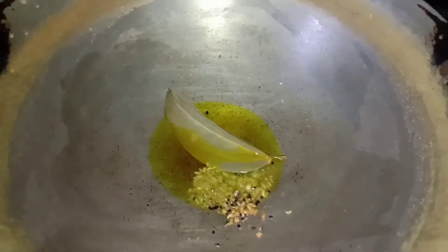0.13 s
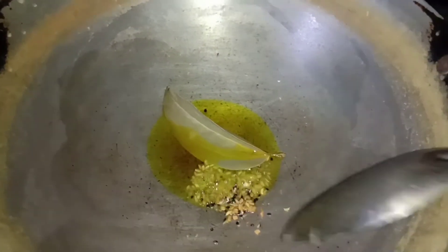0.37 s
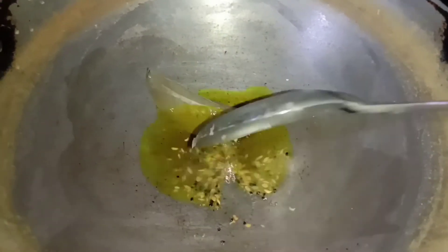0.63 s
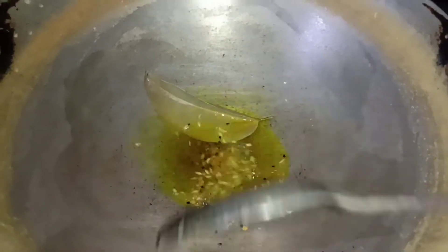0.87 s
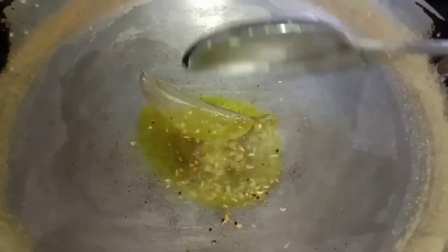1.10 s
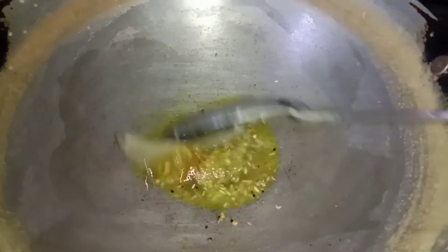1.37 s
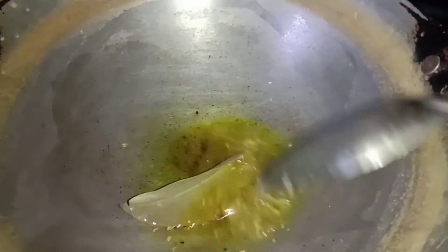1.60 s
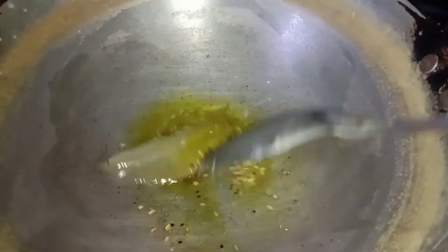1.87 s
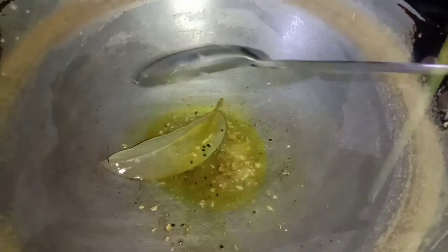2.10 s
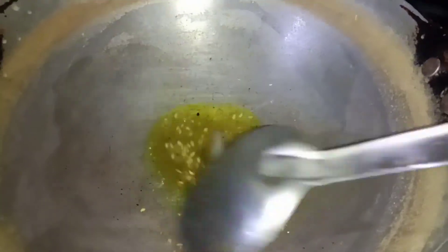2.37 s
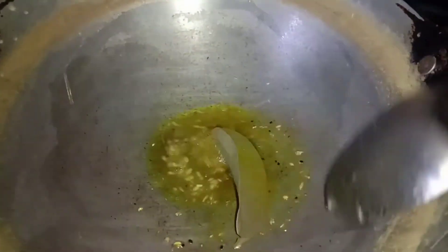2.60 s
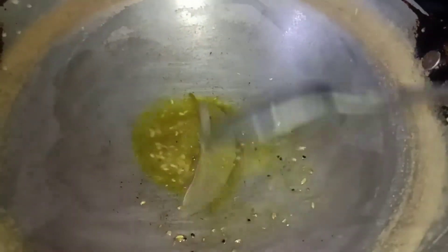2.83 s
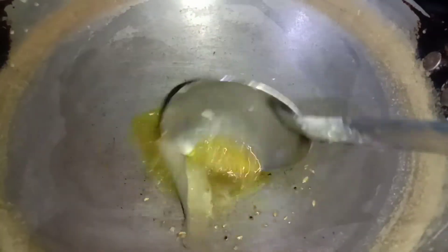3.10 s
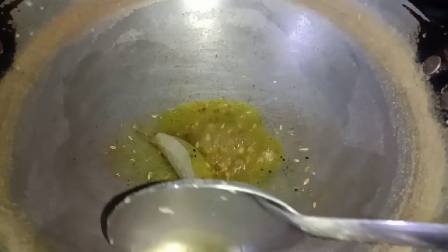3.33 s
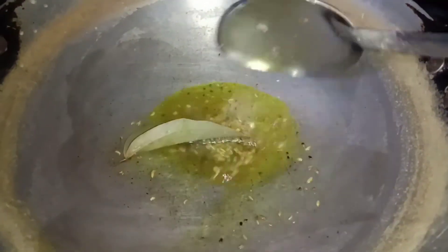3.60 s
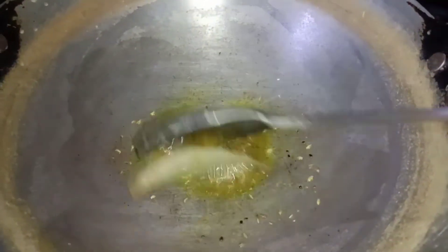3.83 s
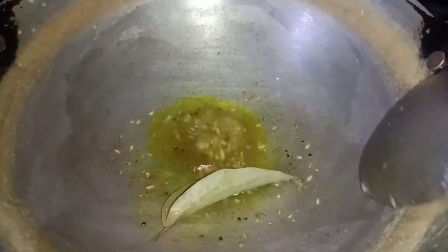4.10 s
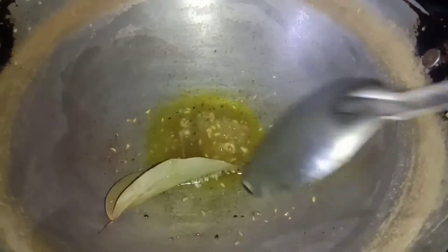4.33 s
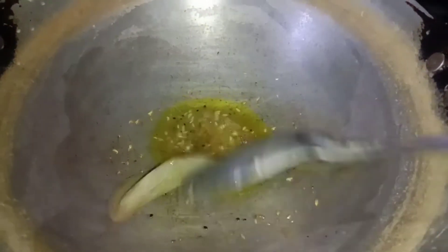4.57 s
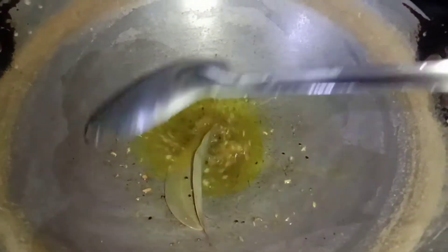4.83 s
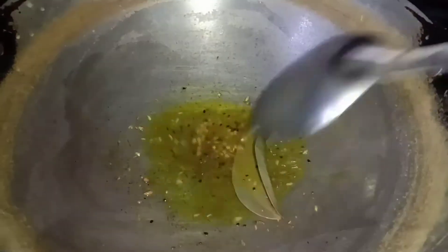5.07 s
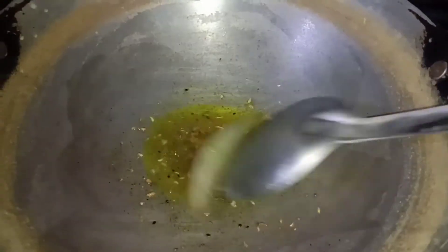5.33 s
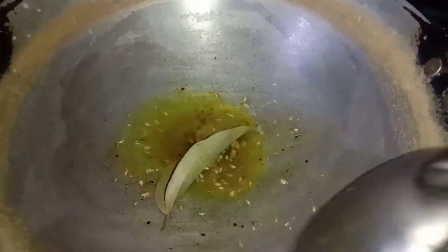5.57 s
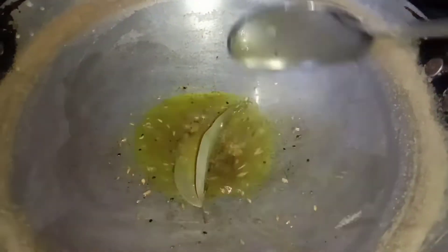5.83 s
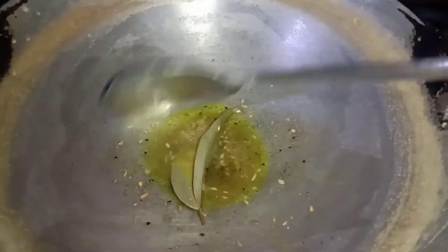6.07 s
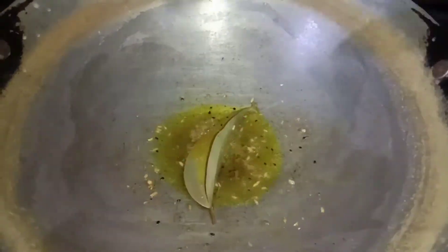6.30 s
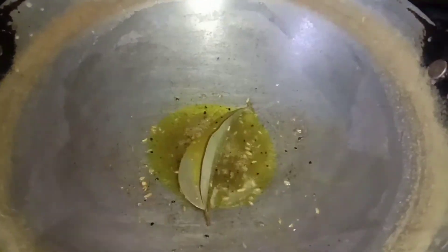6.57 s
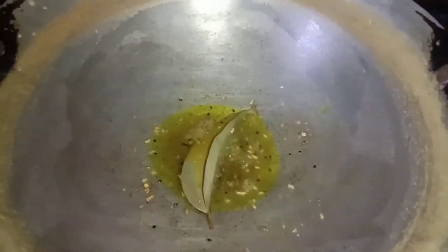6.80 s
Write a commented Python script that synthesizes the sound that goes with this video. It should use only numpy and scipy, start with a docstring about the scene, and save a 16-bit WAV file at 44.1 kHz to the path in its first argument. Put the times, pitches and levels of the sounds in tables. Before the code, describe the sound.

Close crackling fry of spices in oil, swelling quickly from a faint hiss, with metallic spoon clanks, short scrapes and hollow pan thumps.

```python
"""Seeds and a leaf fry in hot oil in a round metal pan, close to a small microphone, for about seven seconds.
The fizz starts faint over a hissing burner and swells in the first second; after 6 s it eases a little.
Steam bubbles burst throughout as short pitched pops among dry ticks; the bowl echoes pops and fizz.
From a third of a second on, a metal spoon knocks on the pan and scrapes along it: clicks ring its modes,
noise makes crack and rasp, and the pushed pan hums and thumps on its stand."""
import sys
import numpy as np
from scipy import signal
from scipy.fft import rfft, irfft, next_fast_len
from scipy.io import wavfile

SR = 44100
rng = np.random.default_rng(int(sys.argv[2]) if len(sys.argv) > 2 else 0)


def natural_amplitude(level_db):
    """Convert a level in decibels to a linear amplitude factor, elementwise."""
    exponent = np.asarray(level_db, float) / 20
    return 10 ** exponent


def put_to_file(sound):
    """Save the sound as 16-bit audio at rate SR, in the file named by the first command-line argument."""
    columns = np.atleast_2d(sound).T  # one column per channel
    safe = np.clip(columns, -1, 1)
    whole_steps = np.round(safe * 32767)
    wavfile.write(sys.argv[1], SR, whole_steps.astype(np.int16))


N = 305613   # samples

# strokes of the spoon along the metal: start_s, length_s, scrape_db, rasp_pitch_hz at the start,
# hum_db of the pan, thump_db on the stand
SPOON_STROKES = [(0.357, 0.19, -50.5, 1200, -51, -52), (0.781, 0.11, -43, 1500, -67, -47),
                 (1.279, 0.18, -47.5, 1800, -64, -57.5), (1.672, 0.37, -48.5, 900, -55.5, -50),
                 (2.084, 0.37, -42, 1100, -55, -46), (2.647, 0.12, -50, 900, -59.5, -63),
                 (2.946, 0.48, -53, 700, -38.5, -41.5), (3.304, 0.048, -38.5, 1700, -50, -46),
                 (3.63, 0.27, -50, 700, -40, -40), (4.094, 0.15, -50, 1000, -61, -60.5),
                 (4.392, 0.32, -46, 1300, -52.5, -51), (4.895, 0.074, -46.5, 900, -58, -57),
                 (5.17, 0.18, -48, 1100, -59.5, -54), (5.542, 0.19, -51, 900, -60.5, -58),
                 (5.84, 0.044, -44.5, 600, -56, -50), (5.915, 0.24, -51.5, 600, -52, -42)]


def rms_one(x):
    """Scale to unit rms."""
    return x / np.sqrt(np.mean(x ** 2) + 1e-20)


def in_time(rows):
    """Columns of a breakpoint table whose first column is seconds, one value a sample."""
    time_s, *columns = np.transpose(rows)
    return [np.interp(np.arange(N) / SR, time_s, column) for column in columns]


def coloured(x, points):
    """Filter x by a curve of (hz, gain_db), straight in log frequency; overall rms 1."""
    size = next_fast_len(N)
    hz = np.maximum(np.arange(size // 2 + 1) * SR / size, 1)
    point_hz, point_db = np.transpose(points)
    gain = natural_amplitude(np.interp(np.log(hz), np.log(point_hz), point_db))
    return rms_one(irfft(rfft(x, size) * gain, size)[..., :N])


def drift(corner_hz):
    """Slow random wander of rms 1: noise through two equal low-pass poles, made every 40 samples."""
    pole = np.exp(-2 * np.pi * corner_hz * 40 / SR)
    noise = rng.standard_normal(N // 40 + 2002)
    slow = signal.lfilter([1], [1, -2 * pole, pole * pole], noise)[2000:]   # past the settling
    return np.interp(np.arange(N) / 40, np.arange(len(slow)), rms_one(slow))


def grains(per_s, spread_db):
    """Random clicks of random sign; a positive spread makes a few large ones among many small."""
    sizes = natural_amplitude(spread_db * np.minimum(rng.exponential(1, N), 4))
    signs = rng.choice([-1, 1], N)
    return sizes * signs * (rng.random(N) < per_s / SR)


def ring(clicks, hz, t60_s):
    """Two-pole resonator: a unit click sets a sine of height 1 ringing."""
    decay, turn = natural_amplitude(-60 / (t60_s * SR)), 2 * np.pi * hz / SR
    poles = [1, -2 * decay * np.cos(turn), decay * decay]
    return signal.lfilter([0, np.sin(turn)], poles, clicks + 1e-18)


def strikes(times_s, levels_db):
    """One click at each time."""
    out = np.zeros(N)
    out[np.minimum((np.asarray(times_s) * SR).astype(int), N - 1)] = natural_amplitude(levels_db)
    return out


def dying(times_s, levels_db, t60_s):
    """Envelope that jumps at each time and dies away exponentially."""
    return signal.lfilter([1], [1, -natural_amplitude(-60 / (t60_s * SR))], strikes(times_s, levels_db) + 1e-18)


def filtered(x, order, hz, kind):
    """Butterworth filter."""
    return signal.sosfilt(signal.butter(order, hz, kind, fs=SR, output="sos"), x)


def bursts():
    """The loud bubble bursts and two softer ones that sputter after each."""
    # loud bursts: peak_s, level_db, pitch_hz
    loud_bursts = [(0.198, -29.5, 6070), (0.6026, -23, 6260), (0.623, -30, 3080), (0.65, -17.5, 4270),
                   (0.687, -24.5, 4500), (0.693, -22.5, 5300), (0.725, -31, 2370), (0.9703, -27, 6960),
                   (0.978, -31, 3200), (1.003, -23, 5700), (1.0242, -26, 3730), (1.2202, -29.5, 1940),
                   (1.276, -20.5, 5640), (1.3488, -21.5, 4170), (1.355, -19, 4700), (1.3773, -17.5, 6780),
                   (1.492, -22.5, 5770), (1.5054, -24.5, 3520), (1.512, -21.5, 5000), (1.56, -16.5, 3660),
                   (1.619, -31, 2290), (1.7102, -19, 4000), (1.7973, -15.5, 5970), (1.8618, -28.5, 3330),
                   (1.9321, -20.5, 2110), (1.9381, -21.5, 2330), (1.9448, -24.5, 3600), (1.974, -27, 7200),
                   (2.0673, -23.5, 2600), (2.0934, -21, 3420), (2.143, -20.5, 3450), (2.1713, -25, 2770),
                   (2.21, -23.5, 3850), (2.227, -23, 3380), (2.274, -19.5, 4380), (2.388, -24, 5000),
                   (2.483, -21.5, 6000), (2.5114, -21, 5280), (2.726, -18.5, 6200), (2.8084, -27, 6600),
                   (2.8376, -22.5, 3000), (2.9343, -21.5, 6110), (2.9613, -25, 1960), (2.975, -20, 2800),
                   (3.0225, -21.5, 3480), (3.04, -20, 4320), (3.0989, -16, 5350), (3.1151, -24, 5860),
                   (3.2117, -25, 3810), (3.2194, -21, 6000), (3.2342, -17, 5740), (3.2346, -24.5, 2720),
                   (3.2512, -24, 2250), (3.39, -26, 3615), (3.465, -27.5, 3770), (3.532, -22.5, 2200),
                   (3.5977, -25.5, 2520), (3.703, -22, 3500), (3.743, -20.5, 4500), (3.7846, -17, 4500),
                   (3.838, -27, 4660), (3.8498, -23.5, 3010), (3.945, -23, 5600), (3.9979, -16, 4080),
                   (4.0122, -23, 2900), (4.0464, -20.5, 2380), (4.0655, -19, 5600), (4.112, -18, 4200),
                   (4.1344, -21.5, 5900), (4.166, -22, 4840), (4.3504, -23, 4450), (4.4883, -21.5, 2420),
                   (4.5503, -25, 2460), (4.7392, -23.5, 3440), (4.858, -30, 2640), (4.9193, -23, 3420),
                   (4.996, -20, 3450), (5.0039, -24.5, 2170), (5.064, -25.5, 3260), (5.092, -25, 6500),
                   (5.1206, -25, 2430), (5.1526, -19.5, 3330), (5.213, -24, 3570), (5.2346, -19, 4305),
                   (5.2536, -20.5, 6640), (5.298, -20, 6770), (5.3818, -29, 2430), (5.405, -26, 3210),
                   (5.417, -23, 5300), (5.428, -27, 2710), (5.4678, -24, 4080), (5.517, -21, 3450),
                   (5.6239, -24.5, 3520), (5.699, -23, 4650), (5.712, -21, 7200), (5.73, -27, 5680),
                   (5.7529, -19, 5900), (5.7588, -19.5, 7460), (5.7668, -23, 3260), (5.8129, -20.5, 5340),
                   (5.8488, -23, 5500), (5.8744, -18.5, 5100), (5.919, -24, 3990), (5.948, -22, 3780),
                   (5.994, -20.5, 4780), (6.0802, -21, 5660), (6.124, -24, 4140), (6.1444, -20, 5600),
                   (6.215, -24, 5000), (6.2517, -19, 5720), (6.2782, -20.5, 6470), (6.2783, -23.5, 3120),
                   (6.3259, -19, 5700), (6.345, -25, 3300), (6.371, -31, 2540), (6.389, -22, 3600),
                   (6.412, -24, 3930), (6.412, -20, 6100), (6.443, -28, 2460), (6.4575, -22.5, 4800),
                   (6.4612, -21.5, 2750), (6.4947, -25, 3060), (6.5426, -23, 6000), (6.556, -39.5, 2800),
                   (6.5706, -20.5, 5800), (6.584, -25, 5170), (6.606, -18.5, 5440), (6.628, -23, 6440),
                   (6.6398, -31, 3400), (6.6911, -17.5, 5510), (6.7085, -18, 5000), (6.7888, -18.5, 5700),
                   (6.81, -21.5, 3280), (6.9126, -34, 2290)]
    gap_s, loss_db, detune = 0.0065, 11.5, 0.12   # detune is a share of the pitch
    s, db, hz = np.transpose(loud_bursts)
    luck = rng.random((len(s), 2, 3))
    after = []
    for k in range(2):
        late_s = s + gap_s * (k + luck[:, k, 0])
        softer_db = db - loss_db * (k + 2 * luck[:, k, 1]) - 0.5
        detuned_hz = hz * (1 + detune * (2 * luck[:, k, 2] - 1))
        after.append((late_s, softer_db, detuned_hz))
    return np.hstack([(s, db, hz), *after])


def pops(chirp=0.0028):
    """A bubble swells and dies within a few cycles, its pitch rising a little as it opens; four places in the pan."""
    s, db, hz = bursts()[:, :, None]
    luck = rng.random((len(s), 3))
    turns = np.arange(400) / SR * hz     # cycles since the start
    width = 1.8 + 2.2 * luck[:, :1]      # cycles to the peak
    shape = (turns / width * np.exp(1 - turns / width)) ** 2
    # the film tears with a snap, strongest within a cycle, before the cavity's peak
    shape += natural_amplitude(-2.0) * (turns / 0.71 * np.exp(1 - turns / 0.96)) ** 2
    phase = turns * (1 + chirp * turns / 2) + luck[:, 1:2]
    waves = natural_amplitude(db) * shape * np.sin(2 * np.pi * phase)
    start = ((s - width / hz) * SR).astype(int)      # the swell begins before the peak
    place = (4 * luck[:, 2:]).astype(int)
    out = np.zeros((4, N + SR))
    np.add.at(out, (place, start + np.arange(400)), waves)
    return out[:, :N]


def fizz(level_db, seethe, per_s=2600, cycles=17.0, clump_db=6.0, hiss_db=-5.0):
    """Small bubbles in clumps, each ringing for some cycles at a pitch set by its size, over a seething hiss."""
    # colour of the fizz: hz, gain_db
    fizz_colour = [(1000, -23.5), (1700, -11.5), (2840, -3), (3080, -3), (3390, -1.5), (4020, 1.5),
                   (4360, 0), (6000, 7.5), (6700, 2), (7320, 5.5), (8370, -12), (10000, -10), (13000, -25),
                   (22000, -120)]
    clicks = grains(per_s * natural_amplitude(clump_db * seethe), spread_db=7.5)
    dealt = rng.integers(0, 20, N)       # which of 20 pitches each bubble has
    rings = []
    for k, hz in enumerate(np.geomspace(1800, 9000, 20)):
        bubbles = ring(clicks * (dealt == k), hz, cycles / hz)
        rings.append(rms_one(bubbles) * np.sqrt(hz))
    # five pitches to each of the four places
    places = rms_one(np.reshape(rings, (5, 4, N)).sum(axis=0))
    hiss = natural_amplitude(hiss_db + 2.0 * drift(37) + 0.28 * seethe) * rng.standard_normal((4, N))
    return natural_amplitude(level_db) * coloured(places + hiss, fizz_colour)


def bowl(places):
    """The curved metal returns a brief cloud of echoes, different for each place in the oil."""
    t60_s, echo_db = 0.12, -4
    t = np.arange(SR // 8) / SR
    tail = rng.standard_normal((len(places), len(t))) * natural_amplitude(-60 * t / t60_s)
    tail *= t > 0.002      # no echo sooner than 2 ms
    reply = natural_amplitude(echo_db) * tail / np.sqrt(np.sum(tail ** 2, axis=1, keepdims=True))
    reply[:, 0] += 1       # the direct sound
    return signal.oaconvolve(places, reply, axes=1)[:, :N].sum(axis=0)


def spray(level_db, seethe):
    """The finest droplets and dry ticks are bare clicks, heard through the microphone's top resonance."""
    # colour of the droplets: hz, gain_db
    spray_colour = [(4710, -33), (8000, -6), (9230, -15.5), (13100, -17), (14500, -8), (15100, -2),
                    (16000, 11.5), (16100, -19), (16300, -58)]
    # dry ticks, splitting seeds and some sharp spoon contacts: start_s, level_db
    dry_ticks = [(0.0655, -27), (1.005, -22), (2.638, -16), (2.8634, -20), (3.022, -18), (3.1865, -16),
                 (3.462, -19), (3.6713, -12), (5.1784, -34), (5.5553, -22), (5.851, -20), (6.6237, -19),
                 (6.8578, -20)]
    droplets = rms_one(grains(5000 * natural_amplitude(5.4 * drift(39) + 5.0 * seethe), spread_db=12.0))
    fine = droplets + 0.7 * rng.standard_normal(N)
    tick = filtered(strikes(*np.transpose(dry_ticks)), 2, 5500, "high")
    mist = natural_amplitude(level_db + 2.0 * drift(3.1)) * coloured(fine, spray_colour)
    return mist + tick + 1.9 * ring(tick, 18000, 0.006)


def stroked(levels_db, rise_s, fade_db_per_s, fall_db_per_s):
    """Gain that rises at each stroke's start, fades while the spoon drags and falls once it lifts."""
    start, length = np.transpose(SPOON_STROKES)[:2, :, None]
    t = np.arange(0, N + 40, 40) / SR - start      # a coarse grid, smoothed over below
    dragged = np.clip(t - rise_s, 0, length - rise_s)
    lifted = np.maximum(t - length, 0)
    db = levels_db[:, None] - fade_db_per_s * dragged - fall_db_per_s * lifted
    power = np.sum((natural_amplitude(db) * np.clip(t / rise_s, 0, 1)) ** 2, axis=0)
    return np.interp(np.arange(N) / 40, np.arange(len(power)), np.sqrt(power))


def rasp():
    """Gritty noise in a broad band around each stroke's pitch; rms 1."""
    climb_per_s, wander = 3.0, 0.15      # shares of the pitch
    start, pitch_hz = np.transpose(SPOON_STROKES)[[0, 3]]
    t = np.arange(N) / SR
    now = np.maximum(np.searchsorted(start, t) - 1, 0)
    # the edge's own note climbs for up to 0.3 s as the stroke speeds up
    climb = climb_per_s * np.clip(t - start[now], 0, 0.3)
    hz = pitch_hz[now] * (1 + climb + wander * drift(12))
    grit = grains(1500 * natural_amplitude(6.1 * drift(30)), spread_db=1.5)
    grit = filtered(grit, 2, 370, "low")
    return rms_one(grit * np.sin(2 * np.pi * np.cumsum(hz) / SR))


def ringing_modes(knocks, chatter):
    """Knocks and their clatter strike all the damped modes; the dragged edge strikes only those below 2 kHz."""
    # pan and spoon modes: pitch_hz, level_db, t60_s
    metal_modes = [(258.7, -18, 0.11), (451.3, -27, 0.17), (659, -16.5, 0.069), (860, -12.5, 0.013),
                   (1220, -11, 0.13), (1292, 0, 0.042), (1634, -9.5, 0.063), (1773, -5, 0.021),
                   (2873, -5.5, 0.04), (3550, -3, 0.064), (4270, -23, 0.086), (5000, -4, 0.14),
                   (5360, -5.5, 0.096), (5350, -3, 0.079), (5540, -17, 0.15), (5740, -33, 0.36),
                   (6270, -47, 0.051), (6130, 12, 0.057), (7290, -9, 0.12), (7920, -5, 0.053),
                   (9300, -43, 0.034)]
    s, level_db, hollow_db, clang_db, hard_db = knocks
    # after a knock the edge skitters on the metal in dense small bounces that die away
    skitter = grains(740, spread_db=-0.5)
    low_bounces = skitter * dying(s, level_db - 33.5, 0.29)
    high_bounces = skitter * dying(s, level_db + hard_db - 30.5, 0.3)
    out = np.zeros(N)
    for hz, mode_db, t60_s in metal_modes:
        if hz < 1000:
            colour_db = hollow_db
        elif hz < 1500:
            colour_db = 0
        elif hz < 2000:
            colour_db = clang_db
        else:
            colour_db = hard_db - 4.0
        # the contact lasts a millisecond or two, so the modes start out of step
        lag_s = rng.uniform(0.0003, 0.0013, len(s))
        luck_db = rng.normal(0, 2.5, len(s))
        blows = strikes(s + lag_s, level_db - 16.0 + colour_db + luck_db)
        bounces = low_bounces + chatter / 10 if hz < 2000 else high_bounces
        out += natural_amplitude(mode_db) * ring(blows + bounces, hz, t60_s)
    return out


def contact_noise(knocks, chatter):
    """Each blow's noise: dull crack, low rumble when hollow, bright splash when hard; chatter joins the lower two."""
    s, level_db, hollow_db, _, hard_db = knocks
    crack = dying(s + 0.00027, level_db - 5.5, 0.026) * rng.standard_normal(N)
    out = filtered(crack + natural_amplitude(-1.0) * chatter, 2, [450, 2600], "band")
    # a hollow blow fills the body of the pan with a short low rumble
    thud = dying(s + 0.00044, level_db + 0.69 * hollow_db - 14.5, 0.086) * rng.standard_normal(N)
    out += filtered(thud + natural_amplitude(-5.0) * chatter, 2, [220, 800], "band")
    # a hard blow adds a bright splash that is gone in a few ms
    splash = dying(s + 0.00048, level_db + 0.73 * hard_db - 8.0, 0.023) * rng.standard_normal(N)
    return out + filtered(splash, 2, [3000, 8500], "band")


def pushed_pan():
    """The pushed pan hums on at its lowest mode, a wavering sine, and thumps loosely on its stand."""
    hum_db, thump_db = np.transpose(SPOON_STROKES)[[4, 5]]
    hum_hz = 161.8 + 3.0 * drift(11.7)
    hum = np.sin(2 * np.pi * np.cumsum(hum_hz) / SR) * natural_amplitude(1.5 * drift(10))
    thump = rms_one(ring(rng.standard_normal(N), 122, 0.09))
    hum_gain = np.sqrt(2) * stroked(hum_db, rise_s=0.038, fade_db_per_s=43, fall_db_per_s=83)
    thump_gain = stroked(thump_db, rise_s=0.032, fade_db_per_s=100, fall_db_per_s=90)
    return hum_gain * hum + thump_gain * thump


def spoon():
    """Knocks and strokes ring the metal, crack and rasp at the contact, and set the pan humming."""
    # spoon knocks: start_s, level_db, and gains hollow_db (low modes), clang_db (middle), hard_db (high)
    spoon_knocks = [(0.351, -6, -8, 6, -15.5), (0.782, -27.5, -27, 19.5, 17.5), (1.218, -20, -30, -19, -23),
                    (1.333, -37, -18, 30, 21.5), (1.675, -14.5, -15, 11, -30), (2.191, -24, -19, 21, -8),
                    (2.294, -11.5, -24, 3, -7), (2.637, -24.5, -11, 17, 15.5),
                    (2.947, -11.5, 14.5, -13, -22), (3.311, -8.5, -11, 1, -12), (3.64, -15.5, 16, -12, -19),
                    (4.3872, -21.5, -16, 18.5, 13), (4.901, -8, -28, 3, -11), (5.177, -11.5, -20, 3, 3.5),
                    (5.545, -29, 14.5, 17.5, -15), (5.849, -16, -15, -10, -4), (6.112, -20.5, 3.5, 7, 3)]
    knocks = np.transpose(spoon_knocks)
    scrape_db = np.transpose(SPOON_STROKES)[2]
    drag = stroked(scrape_db, rise_s=0.013, fade_db_per_s=26.5, fall_db_per_s=143)
    chatter = drag * rms_one(grains(500 * natural_amplitude(6.1 * drift(30)), spread_db=4.0))
    out = ringing_modes(knocks, chatter) + contact_noise(knocks, chatter) + natural_amplitude(-3.5) * drag * rasp()
    out = filtered(out, 3, 220, "high")   # quick contacts move little air in the bass
    return out + pushed_pan()


def burner():
    """Faint flame noise with one breathy band, wavering."""
    # colour of the flame: hz, gain_db
    flame_colour = [(18, -51), (30, -21), (43, -11), (146, 2), (274, -8.5), (551, -11.5), (864, 1.5),
                    (1070, -12), (1260, 15), (1400, -2.5), (1560, -53), (2200, -40), (2860, -40),
                    (4840, -120)]
    level_db = -61 + 2.0 * drift(13) + 0.83 * drift(4.0)
    return natural_amplitude(level_db) * coloured(rng.standard_normal(N), flame_colour)


def scene():
    """Pops and fizz pass through the bowl; spray, spoon and burner join them."""
    # vigour of the frying: time_s, fizz_db (at each of four places), spray_db
    frying_vigour = [(0.0, -59, -49), (0.25, -57.5, -58), (0.46, -54.5, -45.5), (0.7, -42.5, -45),
                     (1.04, -44, -38), (1.54, -41, -43.5), (2.3, -40.5, -40), (3.05, -43, -40.5),
                     (3.65, -39, -39), (4.67, -41.5, -41), (6.0, -41.5, -39.5), (6.52, -46.5, -46),
                     (6.93, -45, -44)]
    fizz_db, spray_db = in_time(frying_vigour)
    seethe = drift(25)      # the boiling comes in quick surges felt by fizz and spray alike
    # the bubbles sound only above about 1.5 kHz
    bubbles = filtered(pops(), 2, 1500, "high") + fizz(fizz_db, seethe)
    oil = bowl(bubbles) + spray(spray_db, seethe)
    return (oil + spoon() + burner())[None, :]


def low_pass(x):
    """Removes everything above the highest recorded frequency."""
    return signal.sosfilt(signal.butter(12, 16660, fs=SR, output="sos"), x)


def record(dry):
    """The small microphone loses the deep bass and the top."""
    top = signal.cheby2(10, 30, 15800, fs=SR, output="sos")
    mix = filtered(signal.sosfilt(top, dry), 3, 75, "high")
    return low_pass(mix)


dry = scene()
out = record(dry)
put_to_file(out)
```